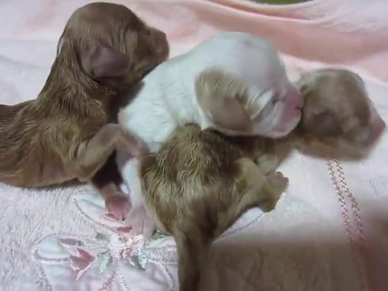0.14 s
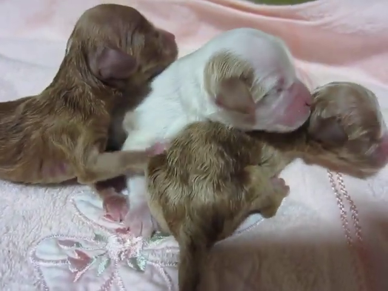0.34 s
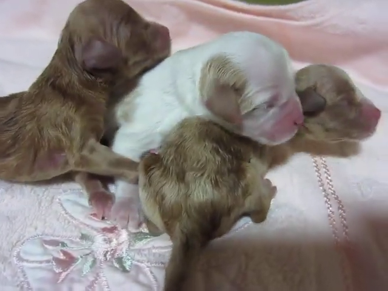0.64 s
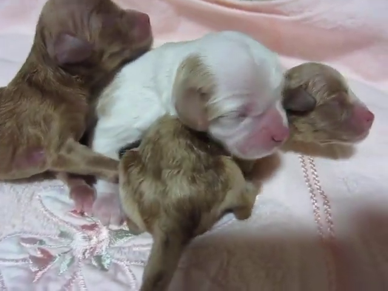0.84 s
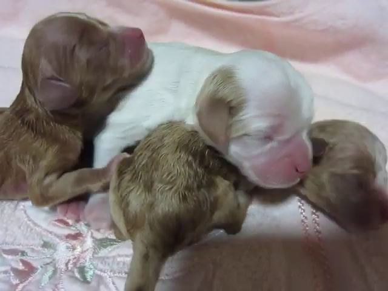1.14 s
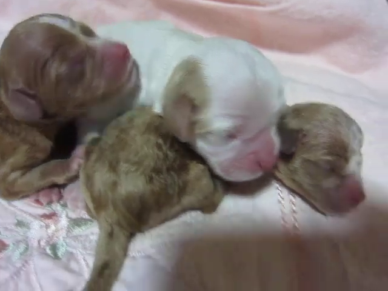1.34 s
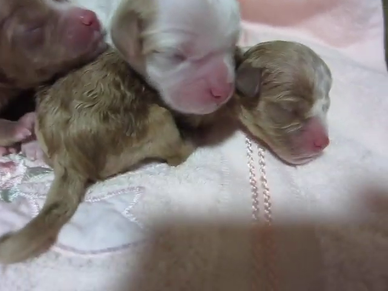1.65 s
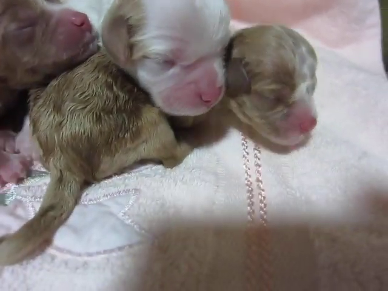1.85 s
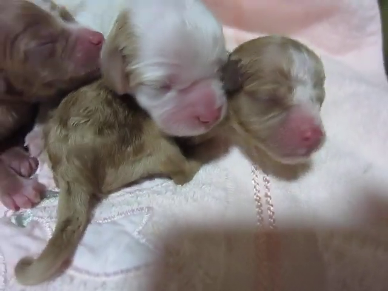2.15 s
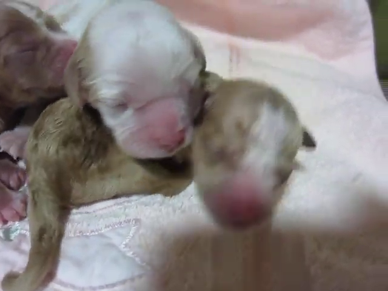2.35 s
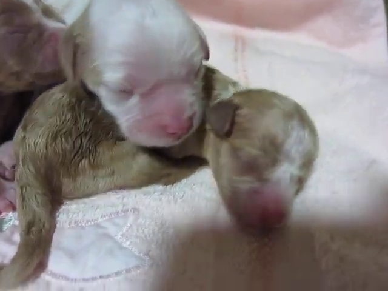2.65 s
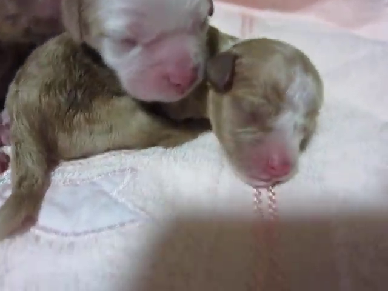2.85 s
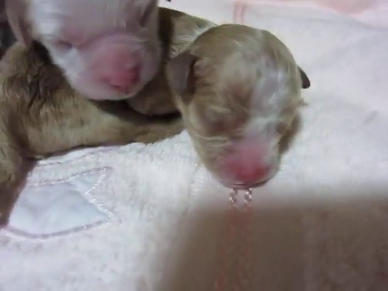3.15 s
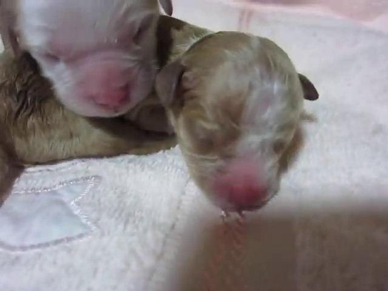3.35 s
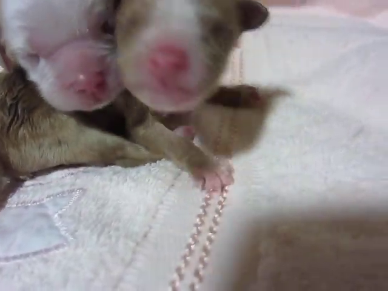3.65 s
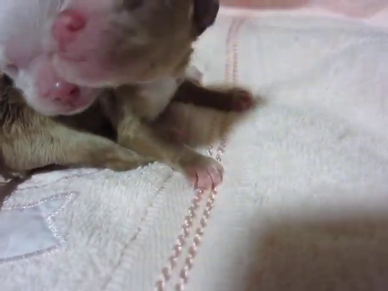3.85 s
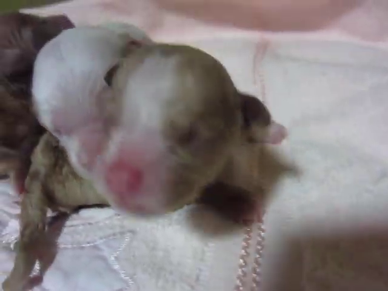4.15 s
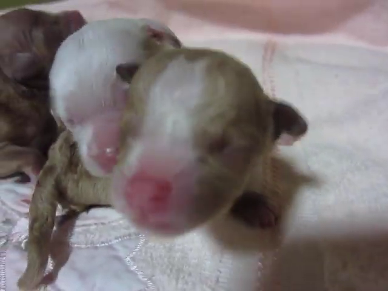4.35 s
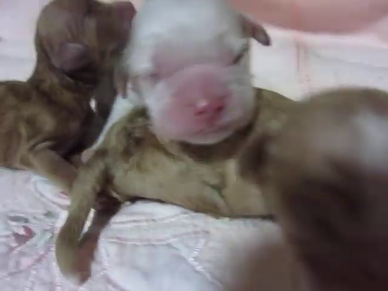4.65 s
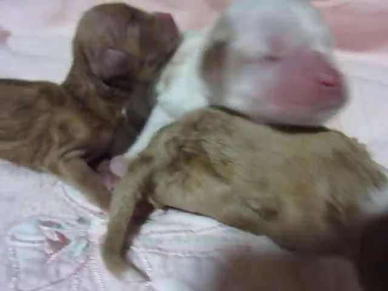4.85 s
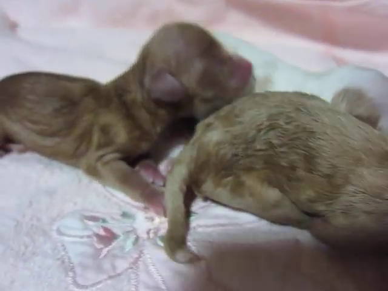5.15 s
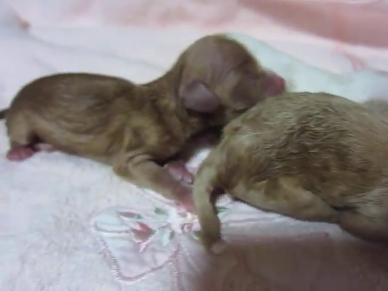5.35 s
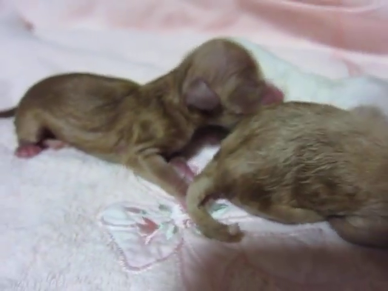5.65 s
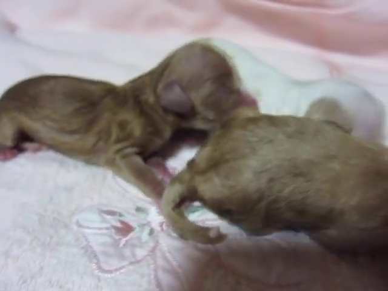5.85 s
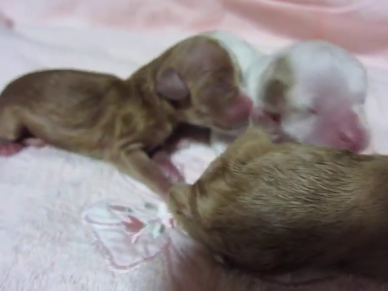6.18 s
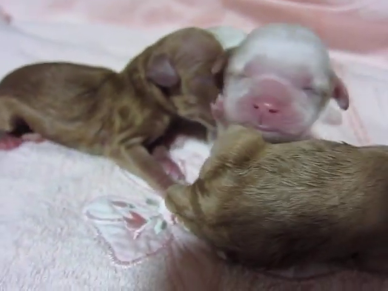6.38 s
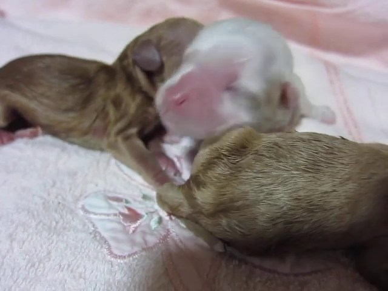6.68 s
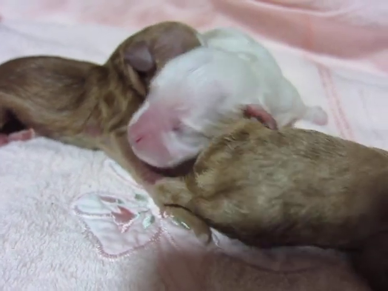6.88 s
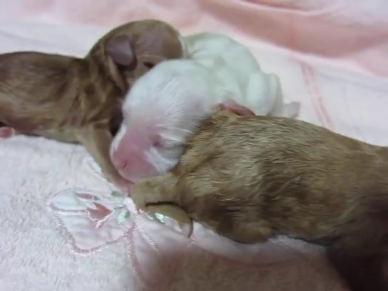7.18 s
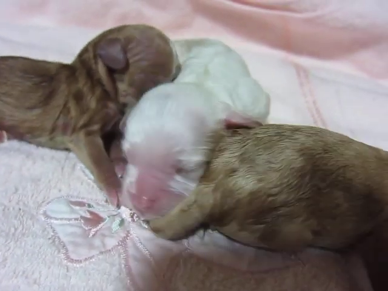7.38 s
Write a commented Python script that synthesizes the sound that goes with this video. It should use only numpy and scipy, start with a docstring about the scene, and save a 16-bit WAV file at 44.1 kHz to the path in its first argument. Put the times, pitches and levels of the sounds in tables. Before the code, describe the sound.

Newborn puppies cry almost continuously, two or three at once, in thin, high squeals that slide up and down and sometimes crack in pitch. The cries come in overlapping waves with only brief gaps, loudest in the first half. Tiny grunts, hoarse gasps and wet mouth clicks fall between and under them. The microphone is very close, in a quiet room with faint rumble, hiss and a short, dull echo.

```python
"""Thin, gliding squeals, two or three at once: newborn puppies on a blanket, a hand's width from a small
stereo camera. Each cry is a clean stack of overtones from the vocal folds, coloured by the mouth, and
now and then it breaks in pitch. Between and under the cries come brief grunts, rasping gasps of unevenly
flapping folds and wet mouth clicks. Behind them a quiet room rumbles and hisses, with a short, dull echo."""
import sys
import numpy as np
from scipy import signal
from scipy.fft import rfft, irfft, next_fast_len
from scipy.io import wavfile
from scipy.ndimage import uniform_filter1d

SR = 44100
rng = np.random.default_rng(int(sys.argv[2]) if len(sys.argv) > 2 else 0)


def int16_out(signal):
    """Quantize to a 16-bit WAV file."""
    q = np.round(np.clip(np.atleast_2d(signal).T, -1, 1) * 32767)
    wavfile.write(sys.argv[1], SR, q.astype(np.int16))


N = 331632


def undb(db):
    return 10 ** (np.asarray(db) / 20)


def eq_curve(hz, table):
    """Gain in dB at hz, on straight lines between (f/Hz, level/dB) points along a log axis."""
    points_hz, db = np.transpose(table)
    return np.interp(np.log(hz + 1), np.log(points_hz), db)


def wobble(n, hold_s):
    """Smooth random modulation with a spread near 1."""
    hold = max(int(hold_s * SR), 2)
    steps = np.repeat(rng.standard_normal(n // hold + 1), hold)[:n]
    return 1.2 * uniform_filter1d(steps, hold)


def ring(x, hz, *widths_hz):
    """A resonance at hz, one pass for each bandwidth given."""
    for width_hz in widths_hz:
        x = signal.lfilter(*signal.iirpeak(hz, hz / width_hz, SR), x)
    return x


def lowpass(x, top_hz):
    return signal.lfilter(*signal.butter(2, top_hz, fs=SR), x)


def place(track, start_s, sound):
    start = int(start_s * SR)
    n = min(sound.shape[-1], N - start)
    track[:, start:start + n] += sound[..., :n]


# Tone of the room bed: f/Hz, relative level/dB
ROOM_SPECTRUM = [(18, -44.5), (30, -13.5), (165, -5.5), (287, -8.5), (437, -11), (913, -17), (7090, -31.5),
                 (10500, -39.5), (16000, -53)]


def room_tone(level_db=-51.5):
    """Rumble mostly shared by both microphone ports, widening into hiss of their own."""
    n = next_fast_len(N)
    hz = np.arange(n // 2 + 1) * SR / n
    mid, side = rfft(rng.standard_normal((2, n))) * undb(eq_curve(hz, ROOM_SPECTRUM))
    side = side * np.clip(0.29 + hz / 3000, 0, 1)
    bed = irfft([mid + side, mid - side], n)[:, :N] * undb([[-.7], [.7]])
    return bed / bed.mean(0).std() * undb(level_db)


# Breakpoints of the hum: t/s, f/Hz, level/dB
HUM_SWELL = [(0.1, 161.3, -59), (0.222, 184.2, -46), (0.4, 172, -57)]


def hum():
    """A faint low sine swells once near the start."""
    times, hz, db = np.transpose(HUM_SWELL)
    t = np.arange(N) / SR
    tone = np.sin(2 * np.pi * np.cumsum(np.interp(t, times, hz)) / SR)
    return np.sqrt(2) * tone * undb(np.interp(t, times, db, left=-120, right=-120))


def room_echo(x, send_db=-27, t60_s=0.23):
    """Short, dull reflections, with a separate tail on each side."""
    t = np.arange(int(.3 * SR)) / SR
    tail = rng.standard_normal((2, len(t))) * np.exp(-np.log(1000) * t / t60_s) * (t > .004)
    tail = ring(tail, 1600, 2000)
    tail = tail / np.sqrt(np.sum(tail ** 2) / 2)
    return undb(send_db) * signal.fftconvolve(x, tail, axes=1)[:, :N]


# Cues for tongue and lips: t/s, peak level before panning/dB, mouth resonance f/Hz
MOUTH_CLICKS = [(0.117, -31, 2200), (0.155, -31.5, 1780), (0.568, -23, 2000), (1.038, -29.5, 2607),
                (1.174, -30, 2780), (1.39, -29.5, 2580), (1.908, -15.5, 2320), (2.057, -27.5, 2590),
                (2.089, -25.5, 1800), (2.468, -23, 1800), (3.28, -31.5, 2200), (3.789, -30, 3000),
                (4.232, -30, 3740), (4.324, -28.5, 1500), (4.39, -28.5, 1600), (4.608, -21, 2560),
                (4.84, -29, 2600), (5.269, -36.5, 1590), (5.529, -36.5, 1200), (5.778, -40, 3000),
                (6.088, -26, 2970), (6.105, -29, 3520), (6.471, -25.5, 3170), (6.719, -36, 2600),
                (7.024, -26.5, 2000), (7.283, -36, 2000)]


def mouth_clicks():
    """Wet snaps: a sharp crack with a millisecond of noise, rung by two hollows of the mouth."""
    track = np.zeros((2, N))
    i = np.arange(int(.008 * SR))
    for start_s, db, mouth_hz in MOUTH_CLICKS:
        crack = (rng.standard_normal(len(i)) + 3 * (i < 3)) * np.exp(-i / SR / 0.0012)
        large_hollow = ring(crack, mouth_hz, 0.49 * mouth_hz, mouth_hz)
        small_hollow = ring(crack, 4600, 1200, 2400)
        snap = lowpass(large_hollow + undb(-5.5) * small_hollow, 5700)
        place(track, start_s, snap / np.abs(snap).max() * undb(db))
    return track


# Cues for hoarse gasps: t/s, length/s, level before fade and panning/dB, throat f/Hz,
# chest over throat/dB, flap rate/Hz
HOARSE_GASPS = [(0.487, 0.016, -38, 4500, 7, 514), (0.512, 0.0099, -37, 4600, 5, 602),
                (0.772, 0.024, -46, 4300, -4, 830), (0.804, 0.016, -43, 4300, -2, 828),
                (1.09, 0.044, -41, 2970, 8, 398), (1.588, 0.014, -28.5, 4220, 3, 603),
                (1.773, 0.027, -39, 4630, -3, 725), (2.214, 0.032, -38.5, 2940, 10, 450),
                (2.425, 0.033, -38, 4200, 3, 701), (2.795, 0.072, -46, 4470, -5.5, 900),
                (3.295, 0.0095, -33.5, 3260, 11, 698), (3.31, 0.034, -33, 3300, 13, 450),
                (3.3822, 0.0061, -27.5, 2960, 1.5, 599), (3.665, 0.055, -41, 4200, -12, 617),
                (3.93, 0.027, -43, 4000, 3, 598), (4.075, 0.055, -46, 4540, -1, 700),
                (7.345, 0.074, -41, 2970, 7, 396.5)]


def rasps(chest_hz=1550):
    """Uneven flaps of the folds, each a sharp pulse with a little air, ring throat and chest and fade."""
    track = np.zeros((2, N))
    for start_s, length_s, db, throat_hz, chest_db, flap_hz in HOARSE_GASPS:
        n = int(length_s * SR)
        cycles = np.cumsum(flap_hz * undb(2.5 * wobble(n, .002))) / SR + rng.random()
        pulses = np.diff(np.floor(cycles), prepend=0) * undb(3.5 * rng.standard_normal(n))
        air = .3 * rng.standard_normal(n) * np.exp(-(cycles % 1) / .2)
        throat = ring(pulses + air, throat_hz, 0.35 * throat_hz, 0.35 * throat_hz)
        chest = ring(pulses + air, chest_hz, 1200, 1200)
        gasp = lowpass(throat / throat.std() + undb(chest_db) * chest / chest.std(), 4800)
        progress = np.arange(n) / n
        envelope = np.sin(np.pi * progress) ** 0.26 * undb(db - 4 * progress)
        place(track, start_s, gasp / gasp.std() * envelope)
    return track


# Cracks in the voice: puppy, t/s, lead-in/s, hold/s, pitch ratio, second harmonic boost/dB
VOICE_BREAKS = [("high", 0.25, 0, 0.04, 1.145, 0.5), ("low", 0.775, 0.01824, 0.047, 0.86, 4.8),
                ("high", 1.39, 0, 0.046, 1.165, 3.9), ("low", 1.79, 0.024, 0.00406, 0.73, 4.8),
                ("middle", 1.909, 0.014, 0.003, 0.92, 7.8), ("middle", 2.427, 0.002, 0.024, 0.68, -4.5),
                ("high", 2.495, 0, 0.041, 1.165, 0.1), ("low", 2.635, 0.02, 0.006, 0.76, 3),
                ("low", 2.808, 0.03, 0.01, 0.85, 0.1), ("middle", 2.824, 0.024, 0.042, 0.87, 0.1),
                ("low", 3.942, 0.022, 0.006, 0.65, 0.1), ("low", 4.093, 0.024, 0.005, 0.7, 0.1),
                ("high", 4.609, 0, 0.047, 1.135, 2.4), ("high", 6.795, 0.0241, 0.045, 0.92, 14.4),
                ("low", 6.824, 0.024, 0.01, 0.78, -4)]


def voice_breaks(t, puppy, snap_s=0.004):
    """The voice slips off its glide and snaps back; gives pitch ratio and second harmonic boost in dB."""
    ratio, boost_db = np.ones(len(t)), 0
    for name, at_s, slip_s, hold_s, full_ratio, full_db in VOICE_BREAKS:
        if name == puppy:
            depth = np.interp(t, [at_s - slip_s, at_s, at_s + hold_s, at_s + hold_s + snap_s], [0, 1, 1, 0])
            ratio = ratio * full_ratio ** depth
            boost_db = boost_db + full_db * depth
    return ratio, boost_db


# Passing mouth shapes, each a bell EQ: puppy, start t/s, end t/s, centre f/Hz, gain/dB
MOUTH_SHAPES = [("middle", 1.62, 1.78, 4900, -11.5), ("high", 4.66, 4.74, 3400, 8.6),
                ("low", 6.11, 6.25, 2500, -7.5), ("low", 6.25, 6.33, 2900, 7)]


def mouth_shape_db(t, hz, puppy, width_octaves=0.26, fade_s=0.015):
    """The mouth changes shape and lifts or mutes an overtone that glides near its centre frequency."""
    db = 0
    for name, start_s, end_s, centre_hz, gain_db in MOUTH_SHAPES:
        if name == puppy:
            depth = np.clip(np.minimum(t - start_s, end_s - t) / fade_s + .5, 0, 1)
            db = db + gain_db * depth * np.exp(-(np.log2(hz / centre_hz) / width_octaves) ** 2)
    return db


# Each mouth favours the fundamental near its resonance. Per puppy: pitch f/Hz, overtone gain/dB
MOUTH_BALANCE = {"high": [(1000, -2), (1130, -1.5), (1260, 0), (1420, -2.5), (1550, -7), (1680, -11.5),
                 (1760, -9.5)], "middle": [(600, 4), (850, 1), (1100, 2.5), (1300, -0.5), (1450, -4),
                 (1600, -11), (1750, -10)], "low": [(500, 1), (650, 4), (800, -2), (900, 2.2), (1030, 0.5),
                 (1200, -1.5)]}
# Roll-off above the second harmonic. Per puppy: f/Hz, relative level/dB
OVERTONE_ROLLOFF = {"high": [(3000, -10.5), (4500, -11.5), (5600, -19.5), (7000, -25), (10000, -35),
                    (13500, -37.5), (16000, -46)], "middle": [(1500, 7.5), (3000, -14.5), (4500, -11),
                    (5600, -21.5), (7000, -30.5), (10000, -33.5), (13500, -41.5), (16000, -52)],
                    "low": [(1500, 9.5), (3000, -9.5), (4300, -9.5), (5600, -21), (7000, -35.5),
                    (10000, -35.5), (13500, -33.5), (16000, -44.5)]}


def voice(puppy, pan_db, second_db, third_db, tilt_db, step_db, opening_db, glide):
    """Vibrating folds sound 21 harmonics along a pitch glide, and the mouth sets their balance."""
    times, glide_hz, glide_db = np.transpose(glide)
    t = np.arange(times[0], times[-1], 1 / SR)
    n = len(t)
    break_ratio, break_db = voice_breaks(t, puppy)
    curves = np.interp(t, times, glide_hz) * break_ratio, np.interp(t, times, glide_db)
    hz, db = (uniform_filter1d(curve, int(.003 * SR), mode="nearest") for curve in curves)
    sunk_db = db.max() - db  # as a cry sinks, its second harmonic stands out and its top rounds off
    overtones_db = second_db + eq_curve(hz, MOUTH_BALANCE[puppy]) + 0.23 * sunk_db + break_db
    overtones_db = overtones_db + opening_db * np.linspace(-.5, .5, n)

    # the folds go slack and uneven where the pitch sags and in very short calls
    is_brief = times[-1] - times[0] < .08
    slack = np.clip((.8 - hz / np.median(hz)) * 4 + .6 * is_brief, 0, 1)
    hz = hz * (1 + 0.0036 * wobble(n, .006) + .06 * slack * wobble(n, .0015))
    side = np.array([[.5], [-.5]])
    left_lead_s = 2e-5 * (pan_db + 3.5)  # the sound reaches one port a little sooner
    cycles = np.cumsum(hz) / SR + rng.random() + side * hz * left_lead_s

    stack = np.cos(2 * np.pi * cycles)
    rolloff, shimmer_db = OVERTONE_ROLLOFF[puppy], 0.3
    for k in range(2, 22):
        harmonic_db = overtones_db + shimmer_db * wobble(n, 0.015)
        if k > 2:
            harmonic_db += third_db + tilt_db * (k - 3) + step_db * (k > 3)
            harmonic_db += eq_curve(k * hz, rolloff) - eq_curve(3 * np.median(hz), rolloff)
            harmonic_db -= (0.16 + 0.027 * (k - 2)) * sunk_db
            harmonic_db -= 0.76 * break_db  # a break's boost stays mostly on the second harmonic
            harmonic_db += mouth_shape_db(t, k * hz, puppy)
            harmonic_db += 3 * wobble(n, 0.0398) + 1.6 * wobble(n, .006)  # the treble flickers
        stack += undb(harmonic_db) * (k * hz < .4 * SR) * np.cos(2 * np.pi * k * cycles - 0.5 * k)
    stack *= 1 + .5 * slack * np.cos(np.pi * cycles)  # slack folds beat strong, weak

    fades = np.clip(np.minimum((t - times[0]) / 0.0002, (times[-1] - t) / 0.0027), 0, 1)
    flutter_db = (shimmer_db + 5 * slack) * wobble(n, .003)
    rattle_db = 2.5 * (t > 5.58) * (t < 5.675) * wobble(n, 0.00575)  # any voice sounding from 5.58 to 5.675 s rattles: a whine as it starts, and a grunt
    return np.sqrt(2) * stack * fades * undb(db + flutter_db + rattle_db + side * pan_db)


# Cues for grunts: t/s, length/s, opening f/Hz, f/Hz at the peak, closing f/Hz, fundamental level/dB,
# pan (left minus right)/dB
BRIEF_GRUNTS = [(1.095, 0.066, 1042, 900, 582, -39, -5.7), (2.221, 0.054, 738, 785, 542, -36, -3.5),
                (3.297, 0.01, 1040, 1010, 820, -29, -1), (3.309, 0.06, 905, 778, 420, -32.5, -3),
                (4.339, 0.04, 558, 512, 420, -37, -2), (5.6, 0.027, 1010, 1085, 1180, -44.5, -6),
                (5.742, 0.047, 950, 910, 780, -43.5, -5.6)]


def grunts(peak_share=0.2, hold_share=0.51):
    """Tiny cries in the low voice that swell slightly, hold and drop away."""
    track = np.zeros((2, N))
    for start_s, length_s, first_hz, peak_hz, last_hz, db, pan_db in BRIEF_GRUNTS:
        held_hz = peak_hz + (last_hz - peak_hz) * (hold_share - peak_share) / (1 - peak_share)
        glide = [(start_s, first_hz, db - 0.5),
                 (start_s + peak_share * length_s, peak_hz, db),
                 (start_s + hold_share * length_s, held_hz, db),
                 (start_s + length_s, last_hz, db - 13.5)]
        grunt = voice("low", pan_db, second_db=-11.5, third_db=-12, tilt_db=-1, step_db=0,
                      opening_db=-8, glide=glide)
        place(track, start_s, grunt)
    return track


# Cues for squeals, with their base tone before mouth and loudness shape it: puppy,
# pan (left minus right)/dB, second harmonic over fundamental/dB, third over second/dB,
# tilt per higher harmonic/dB, step above the third/dB, overtone rise from start to end/dB,
# glide of (t/s, f/Hz, fundamental level/dB)
SQUEALS = [ ("high", -2.1, 1.5, -14, -1.5, 0.1, -3.9, [(0.0, 1632, -31.5), (0.068, 1540, -38.5),
           (0.112, 1378, -38.5), (0.142, 927, -61)]),
           ("low", -2.7, -8, -17, 0.5, 0.1, -9, [(0.0, 1054, -29.5), (0.048, 1006, -36.5),
           (0.082, 1195, -42)]), ("high", -7, -7.5, -23, 0.44, 0.1, 3, [(0.25, 1440, -42.5),
           (0.266, 1283, -31), (0.302, 1270, -26), (0.394, 1510, -22.5), (0.418, 1671, -26.5),
           (0.557, 1694, -26), (0.609, 1725, -31), (0.775, 1746, -37), (0.855, 1626, -36)]),
           ("middle", -2.2, 0.94, -17.5, 0, 0.1, -6, [(0.47, 835, -55), (0.506, 1103, -40.5),
           (0.55, 1211, -37), (0.67, 1453, -35.5), (0.745, 1563, -37.5), (0.83, 1646, -36.5),
           (0.877, 1608, -35.5), (0.977, 1578, -35), (1.041, 1662, -34), (1.085, 1600, -36.5),
           (1.14, 1380, -39.5), (1.184, 1140, -50.5)]),
           ("low", -2.4, -5.5, -15.5, 0, 0.1, 0.93, [(0.57, 825, -32), (0.682, 1051, -30.5),
           (0.755, 968, -29), (0.83, 1006, -25), (0.861, 1108, -28.7), (1.001, 1035, -39),
           (1.037, 1107, -45)]), ("high", -6, -6.5, -22, 0.66, 0.1, 0.8, [(1.39, 1336, -37.5),
           (1.398, 1214, -34.5), (1.434, 1282, -24), (1.47, 1254, -26.5), (1.546, 1571, -22),
           (1.586, 1552, -27.5), (1.677, 1716, -24.5), (1.725, 1692, -18), (1.773, 1729, -18.5),
           (1.889, 1747, -25), (2.068, 1695, -38), (2.098, 1390, -60)]),
           ("middle", -1.3, -5, -3.5, 0.1, -2, -9.5, [(1.53, 1004, -54), (1.606, 1384, -32),
           (1.642, 1616, -21), (1.678, 1734, -18.5), (1.761, 1548, -27.5), (1.785, 1327, -34),
           (1.885, 1372, -31.5), (1.925, 1415, -31.5), (1.969, 1467, -36), (2.067, 1220, -55)]),
           ("low", -2.65, -5, -15.5, 0.6, 0.1, -2.2, [(1.625, 1247, -36), (1.689, 987, -30),
           (1.765, 936, -34), (1.84, 880, -30.5), (1.852, 1024, -25), (1.96, 1013, -31),
           (2.008, 1080, -34.5), (2.072, 943, -34.5), (2.094, 980, -49)]),
           ("middle", -0.57, 1, -16, 0.32, 0.1, 0.12, [(2.413, 1041, -46), (2.457, 1063, -35),
           (2.533, 1081, -33), (2.605, 1213, -38), (2.768, 1262, -42), (2.804, 1205, -35.5),
           (2.85, 1168, -28.5), (2.89, 1170, -32), (2.948, 1186, -35.5), (3.068, 1284, -35.5),
           (3.207, 1160, -42.5), (3.245, 940, -52)]),
           ("high", -4.5, -2.3, -22.5, 0, 0.1, 0.1, [(2.495, 1406, -37), (2.507, 1258, -27.5),
           (2.551, 1258, -22), (2.607, 1416, -21), (2.722, 1628, -21.5), (2.802, 1573, -18.5),
           (2.862, 1682, -20), (3.094, 1698, -27.5), (3.177, 1637, -38.5), (3.193, 1500, -49)]),
           ("low", -1.35, -5.5, -15.5, 0.5, 0.1, -2, [(2.545, 975, -35), (2.621, 910, -39.5),
           (2.665, 973, -38.5), (2.741, 1042, -29), (2.824, 982, -33.5), (2.87, 1017, -28),
           (2.92, 1079, -26.5), (3.008, 1024, -31.5), (3.076, 1164, -40.5)]),
           ("high", -1.3, -1, -19.5, 0.75, 2, 4.4, [(3.599, 1613, -27), (3.619, 1264, -22),
           (3.687, 1302, -19), (3.719, 1386, -21), (3.759, 1400, -24), (3.783, 1539, -24),
           (3.834, 1590, -24), (4.018, 1615, -27), (4.182, 1478, -39), (4.206, 1426, -51)]),
           ("middle", 0.89, 1.4, -14, -1.3, 0.1, 0.1, [(3.675, 521, -50), (3.723, 793, -35.5),
           (3.8, 1085, -37.5), (3.855, 1348, -38), (3.978, 1148, -39.5), (4.1, 1096, -39.5),
           (4.175, 1103, -45.5), (4.226, 917, -58)]),
           ("low", -1.5, -10.5, -12.5, 0, 0.1, 0.093, [(3.79, 996, -33), (3.84, 945, -35),
           (3.914, 1000, -43), (3.958, 937, -34), (4.053, 1007, -25.5), (4.068, 968, -29.5),
           (4.105, 851, -32), (4.133, 818, -28.5), (4.153, 981, -27.5), (4.367, 1074, -44.5)]),
           ("high", -6.5, 0, -14, 1, -8, -7, [(4.609, 1130, -40), (4.617, 1105, -37), (4.653, 1127, -28.5),
           (4.665, 1138, -26.5), (4.717, 1115, -26), (4.844, 1246, -30.5), (5.048, 1336, -31.5),
           (5.12, 1477, -36.5), (5.172, 1506, -46)]),
           ("middle", 0.38, 0, -6, 0, -3, 3.1, [(4.665, 1360, -38), (4.685, 1353, -31),
           (4.733, 1575, -27.5), (4.761, 1604, -33), (4.793, 1570, -38), (4.92, 1449, -39),
           (5.03, 1316, -49), (5.09, 970, -51.5)]),
           ("low", -6, -12.5, -15.5, 0.44, 0.1, -3, [(4.95, 1021, -42.5), (5.054, 973, -31.5),
           (5.13, 800, -29), (5.193, 840, -37)]),
           ("middle", -1.85, -9.5, 7, -9.5, 0.2, 1, [(5.557, 1340, -40.5), (5.593, 1618, -29.5),
           (5.629, 1687, -28), (5.689, 1550, -36), (5.735, 1405, -39), (5.832, 1497, -38.5),
           (5.928, 1505, -36.5), (6.0, 1377, -43.5), (6.045, 1150, -51), (6.076, 933, -51)]),
           ("high", -7.5, -7.5, -14.5, 1, 0.1, -18, [(5.885, 1035, -48.5), (5.917, 1145, -47),
           (6.001, 1243, -41), (6.053, 1420, -36.5), (6.081, 1436, -37.5), (6.178, 1450, -54)]),
           ("low", -5.5, -11.5, -9, -0.8, 0.5, 6.1, [(6.107, 802, -41), (6.123, 848, -35),
           (6.191, 885, -27.5), (6.247, 1040, -25), (6.334, 823, -23.5), (6.354, 735, -25.5),
           (6.41, 758, -27), (6.45, 829, -27), (6.474, 792, -39)]),
           ("middle", -2.6, -12.5, -4.5, 1.74, 0.1, 4.4, [(6.415, 1015, -46.5), (6.451, 1340, -37),
           (6.479, 1363, -32.5), (6.507, 1543, -29), (6.535, 1600, -31), (6.634, 1476, -37.5),
           (6.774, 1515, -33.5), (6.842, 1453, -36), (6.886, 1460, -36.5), (6.99, 1305, -42.5),
           (7.03, 1140, -45)]), ("high", -8, -14.5, -13, -1.7, 0.1, -2.5, [(6.735, 1438, -36),
           (6.775, 1398, -25), (6.815, 1290, -25.5), (6.871, 1496, -28), (6.92, 1502, -31.5),
           (6.958, 1550, -29), (7.0, 1497, -27.5), (7.042, 1399, -29), (7.122, 1662, -29.5),
           (7.212, 1527, -42)]), ("low", -1.2, -9, -12, -1.6, 0.1, 0.1, [(6.8, 963, -38.5),
           (6.824, 933, -34), (6.848, 943, -34.5), (6.9, 834, -25.5), (6.972, 778, -25), (7.012, 819, -28),
           (7.027, 775, -28.5)]), ("middle", 0.44, 2, -3, -0.25, -1.5, 0.1, [(7.352, 444, -60),
           (7.384, 637, -39.5), (7.424, 719, -36), (7.52, 661, -38.5)]),
           ("low", -1.9, -13.5, -9, -1.5, 0.1, 0.1, [(7.468, 1070, -35), (7.48, 1008, -31.5),
           (7.52, 956, -26.5)]), ]


def squeals():
    """The lead layer: a high, a middle and a low puppy cry over one another."""
    track = np.zeros((2, N))
    for *settings, glide in SQUEALS:
        place(track, glide[0][0], voice(*settings, glide))
    return track


def scene():
    """The litter up close, its echo and the room bed behind."""
    lean_right = undb([[-1.5], [1.5]])
    litter = squeals() + grunts() + lean_right * (rasps() + mouth_clicks())
    return litter + room_echo(litter) + room_tone() + hum()


def record(dry, notch_hz=11260, notch_width_hz=3860, top_hz=15900):
    """A band of treble around 11 kHz is hollowed out; the top is cut steeply."""
    notched = signal.lfilter(*signal.iirnotch(notch_hz, notch_hz / notch_width_hz, SR), dry)
    return signal.sosfilt(signal.ellip(10, .2, 80, top_hz, fs=SR, output="sos"), notched)


dry = scene()
out = record(dry)
int16_out(out)
```